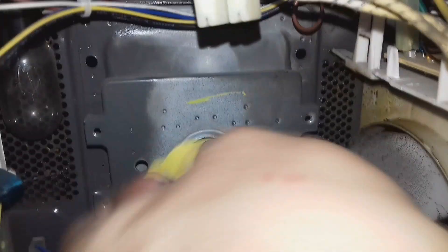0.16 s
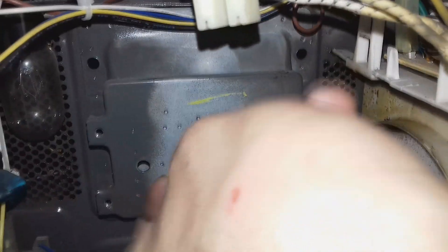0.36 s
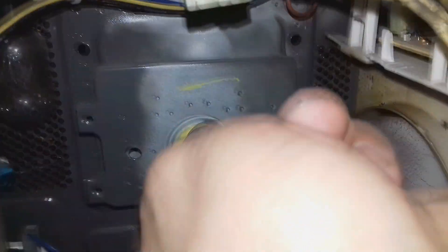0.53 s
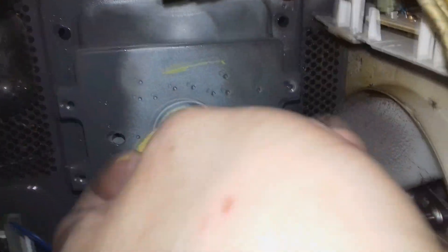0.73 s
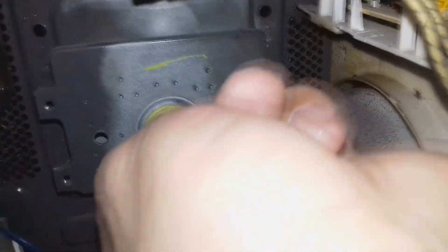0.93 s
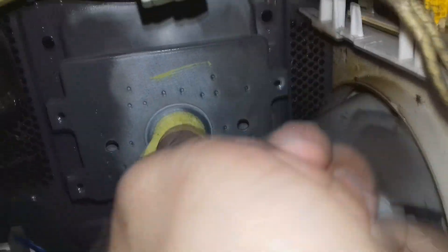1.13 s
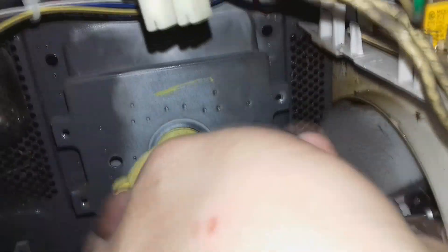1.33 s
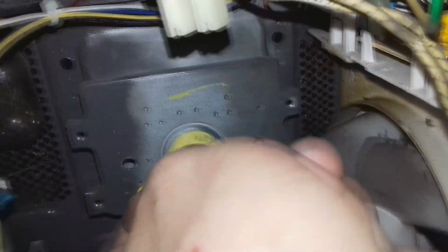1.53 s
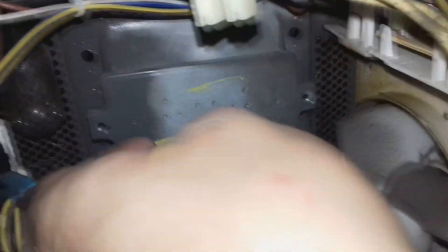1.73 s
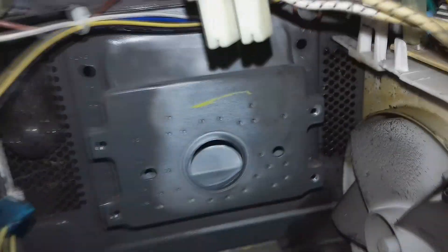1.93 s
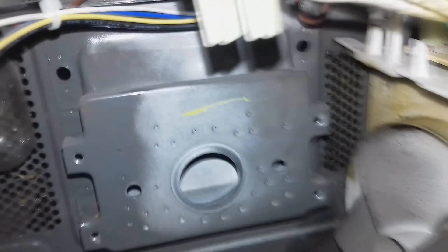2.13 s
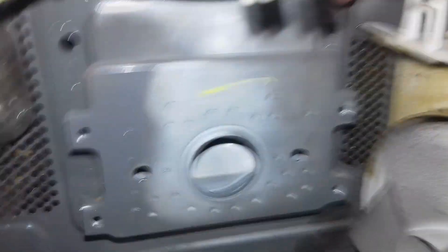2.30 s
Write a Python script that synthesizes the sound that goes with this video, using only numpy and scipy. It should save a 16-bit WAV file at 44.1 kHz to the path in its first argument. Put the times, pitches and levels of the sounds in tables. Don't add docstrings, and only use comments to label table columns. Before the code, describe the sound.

Short scratchy sandpaper strokes on thin metal, with hand bumps, then a rustle and small tick

```python
import sys
import numpy as np
from scipy import signal
from scipy.io import wavfile
from scipy.ndimage import uniform_filter1d

SR = 44100
rng = np.random.default_rng(int(sys.argv[2]) if len(sys.argv) > 2 else 0)


def to_wav(sig):
    pcm = np.clip(np.atleast_2d(sig), -1, 1) * 32767
    pcm = np.round(pcm).astype(np.int16)
    wavfile.write(sys.argv[1], SR, pcm.T)


def volts(x):
    e = np.asarray(x, float) / 20
    return 10 ** e


N = 108486

# f/Hz, level/dB per Hz
SHEET_SPECTRUM = [(590, -15.5), (1000, -26), (1280, -10), (1510, -6.5), (1810, -2.5), (2100, -12.5),
                  (3240, 0), (3630, -10.5), (6000, -31.5), (7800, -49.5), (13200, -120)]


def evened(x):
    return x / np.sqrt(np.mean(x ** 2) + 1e-20)


def unit(x):
    return x / np.linalg.norm(x)


def filtered(x, order, hz, kind):
    return signal.sosfilt(signal.butter(order, hz, kind, fs=SR, output="sos"), x)


def coloured(x, points):
    hz = np.maximum(np.fft.rfftfreq(4096, 1 / SR), 1)
    f, db = np.transpose(points)
    octaves_out = np.log2(np.maximum(f[0] / hz, 1)) + np.log2(np.maximum(hz / f[-1], 1))
    level_db = np.interp(np.log(hz), np.log(f), db) - 40 * octaves_out
    log_gain = np.log(volts(np.maximum(level_db, -100)))
    full = np.concatenate([log_gain, log_gain[-2:0:-1]])
    taps = np.fft.ifft(np.exp(np.conj(signal.hilbert(full)))).real
    return signal.oaconvolve(x, unit(taps))[:len(x)]


def add(mix, s, sound):
    part = mix[max(round(s * SR), 0):][:len(sound)]
    part += sound[:len(part)]


def rings(modes, t):
    return sum(volts(db - 60 * t / max(t60, .004)) * np.sin(2 * np.pi * hz * t) for hz, db, t60 in modes)


def workshop_air():
    # f/Hz, level/dB per Hz
    air_spectrum = [(18, -20), (30, 7), (55, -20), (443, -7), (966, -8), (1720, 0.5), (2510, -8.5),
                    (4480, -32), (12300, -21), (15900, -56), (22000, -120)]
    return volts(-55) * evened(coloured(rng.standard_normal(N), air_spectrum))


def hand_bumps():
    # t/s, level/dB, f/Hz, t60/s
    bumps = [
        (0.109, -36, 278, 0.063),
        (0.679, -45, 154, 0.23),
        (0.729, -36.5, 200, 0.1),
        (1.05, -40, 311, 0.2),
        (1.18, -31, 248.5, 0.14),
        (1.202, -40, 150, .3),
        (1.26, -44, 240, 0.22),
        (1.641, -39.5, 243, .15),
        (1.98, -52.5, 111.6, 0.48),
        (2.385, -43, 560, 0.033),
    ]
    out, t = np.zeros(N), np.arange(SR // 3) / SR
    soft_onset = np.minimum(t / 0.0044, 1)
    for s, db, hz, t60 in bumps:
        add(out, s, rings([(hz, db, t60), (hz * 1.555, db - 1, t60 * 0.39)], t) * soft_onset)
    return out


def part_tick():
    # f/Hz, level/dB, t60/s
    tick_modes = [(1735, -3, .03), (2650, 7, .005), (3420, -2, .016), (1760, -15, .15)]
    tick_s, tick_db, crack_db, crack_decay_s = 2.402, -29, -42, .0012
    out, t = np.zeros(N), np.arange(SR // 3) / SR
    crack = evened(coloured(rng.standard_normal(len(t)), SHEET_SPECTRUM))
    add(out, tick_s, volts(tick_db) * rings(tick_modes, t) * np.minimum(t / .00015, 1))
    add(out, tick_s, volts(crack_db) * crack * np.exp(-t / crack_decay_s))
    return out


def hand_rustle():
    # t/s, level/dB
    rustle_level = [(2.05, -112), (2.199, -54.5), (2.331, -49.5), (2.4, -55), (2.46, -50.5)]
    centre_hz, width_hz = 2480, 1120
    rub = evened(filtered(grit(), 2, [centre_hz - width_hz / 2, centre_hz + width_hz / 2], "band"))
    s, db = np.transpose(rustle_level)
    return rub * volts(np.interp(np.arange(N) / SR, s, db, left=-90))


def hand_drag(dull):
    rumble = filtered(rng.standard_normal(N), 2, [74, 200], "band")
    return volts(-60) * evened(rumble * uniform_filter1d(dull + 1e-4, 3000) ** 0.36)


def grit():
    grains_per_s, spread_db, chatter_db, chatter_s = 7000, 3, 1.5, 0.0033
    size = volts(spread_db * np.minimum(rng.exponential(1, N), 5)) * rng.choice([-1., 1.], N)
    grains = size * (rng.random(N) < grains_per_s / SR)
    span = max(round(chatter_s * SR), 2)
    chatter = evened(uniform_filter1d(uniform_filter1d(rng.standard_normal(N), span), span))
    return evened(grains * volts(chatter_db * chatter))


def snags():
    # t/s, level/dB
    catches = [(.129, -7.5), (.233, -23), (.249, -15), (.509, -20.5), (.632, -14), (0.652, -15),
               (.735, -11.5), (.778, -13.5), (1.009, -16), (1.032, -10), (1.206, -16), (1.235, -9),
               (1.62, -24.5), (1.7, -17), (1.816, -15.5)]
    snag_db, decay_s = -13.5, 0.0022
    out, t = np.zeros(N), np.arange(1200) / SR
    for s, db in catches:
        burst = rng.standard_normal(len(t)) * np.exp(-t / decay_s)
        add(out, s - .001, 4 * volts(db + snag_db) * burst)
    return out


def pressure():
    # start t/s, strongest t/s, end t/s, pressure level/dB, brightness tilt/dB
    strokes = [(-.02, -0.001, 0.023, -25.5, -1), (0.071, 0.115, .2, -27.5, -2),
               (0.215, 0.253, 0.31, -24, -3), (0.307, 0.318, 0.37, -30.5, -2),
               (0.436, 0.478, 0.49, -34, 1.5), (0.518, 0.49, 0.6, -38, -0.5), (.595, 0.639, .655, -29, 0.5),
               (0.639, 0.69, .703, -11, 1), (0.723, 0.727, 0.76, -17, -6), (0.788, 0.783, .84, -24, -0.5),
               (0.816, 0.876, .94, -24.5, -0.5), (1.009, 1.001, 1.039, -32, 5.5),
               (1.03, 1.065, 1.085, -17, -2), (1.085, 1.122, 1.15, -38, -11.5),
               (1.202, 1.217, 1.232, -24, 2), (1.236, 1.24, 1.306, -25.5, -0.5),
               (1.275, 1.28, 1.375, -28.5, -2.5), (1.392, 1.411, 1.465, -32, 0),
               (1.432, 1.45, 1.485, -32.5, -5), (1.521, 1.561, 1.57, -22, 0),
               (1.601, 1.649, 1.695, -31, 1.5), (1.685, 1.725, 1.94, -29.5, -1),
               (1.813, 1.84, 1.86, -18, 1.5), (1.827, 1.885, 1.925, -9.5, -3.5)]
    rise_db_per_s, lift_off_db = 255, -9
    t, dull, bright = np.arange(N) / SR, np.zeros(N), np.zeros(N)
    for start, top, end, db, tilt_db in strokes:
        times = [start - .001, start, top, end, end + 0.0085]
        levels = [-60, -rise_db_per_s * (top - start), 0, lift_off_db, -60]
        shape = volts(db + np.interp(t, times, levels))
        dull += (shape * volts(-tilt_db)) ** 2
        bright += (shape * volts(tilt_db)) ** 2
    return np.sqrt(dull), np.sqrt(bright)


def panel():
    # f/Hz, level/dB per Hz
    fizz_spectrum = [(3410, -35), (5800, -3), (7740, 1.5), (9390, -13.5), (9940, -1.5), (10500, -5.5),
                     (10900, -13), (11600, -6.5), (12300, -33), (15900, -47), (22000, -120)]
    # f/Hz, level/dB per Hz
    cabinet_spectrum = [(140, -30.5), (230, -9.5), (296, 1), (329, -15), (363, 4), (496, -6.5), (842, -1.5),
                        (1000, -9.5), (1300, -53), (2200, -120)]
    # f/Hz, level/dB, t60/s
    panel_modes = [(2350, -6, .12), (1297, -5, .35), (1661, -10, .25), (1748, -7, .36), (1845, -4, .3),
                   (1905, -5, .25), (2600, -3, .15), (2833, -7, .25), (2983, -4, .35), (3144, -1, .36),
                   (3290, -3, .14), (3460, -9, .2), (3711, -11, .2), (4554, -15, .25)]
    scratch_t60, ring_t60, room_t60 = 0.021, 0.23, 0.7
    scratch_db, ring_db, room_db, direct_db = -0.5, -3.5, -7.5, -3
    t = np.arange(SR) / SR
    scratch, ring, room = rng.standard_normal((3, SR))
    dense = volts(scratch_db) * unit(scratch * volts(-60 * t / scratch_t60))
    dense += volts(ring_db) * unit(ring * volts(-60 * t / ring_t60))
    dense += volts(room_db) * unit(room * volts(-60 * t / room_t60) * np.minimum(t / 0.012, 1))
    dense += volts(direct_db) * (t == 0)
    sheet = unit(unit(coloured(dense, SHEET_SPECTRUM)) + volts(-10) * unit(rings(panel_modes, t)))
    low = signal.sosfiltfilt(signal.butter(2, 1900, fs=SR, output="sos"), sheet)
    fizz = volts(-28) * unit(coloured(dense, fizz_spectrum))
    cabinet = volts(-17) * unit(coloured(dense, cabinet_spectrum))
    return low, sheet - low, fizz, cabinet


def sanding(dull, bright):
    fresh_db, fresh_s = 9, 0.29
    wander_s = 0.08903
    now, out = np.arange(N) / SR, np.zeros(N)
    grains, catches = grit(), snags()
    mean = np.sqrt(dull * bright) / volts(-30)
    fizz = volts(-28.5 + fresh_db * (now < fresh_s)) * mean ** 0.77
    boom = volts(-30) * mean ** 0.7
    drives = [grains * p + catches for p in (dull, bright, fizz)] + [grains * boom]
    for spot in range(3):
        share = np.sqrt(2 / 3) * np.sin(np.pi * (now / (3 * wander_s) + spot / 3))
        for drive, body in zip(drives, panel()):
            out += signal.oaconvolve(share * drive, body)[:N]
    return filtered(out, 4, 240, "high")


def scene():
    dull, bright = pressure()
    handling = hand_bumps() + part_tick() + hand_rustle() + hand_drag(dull)
    return (workshop_air() + handling + sanding(dull, bright))[None]


def thinned_treble(x):
    from_hz = 5500
    hz, t, z = signal.stft(x, SR, nperseg=2048, noverlap=1536)
    power = uniform_filter1d(abs(z) ** 2, size=5, axis=2) + 1e-16
    power_db = 10 * np.log10(power)
    loud_db = 10 * np.log10(power[:, 50:180].mean(1, keepdims=True))
    near_db = 1.2 + uniform_filter1d(power_db, size=91, axis=1)
    patches = rng.standard_normal((65, len(t) // 7 + 1))
    chance = np.repeat(np.repeat(patches, 16, axis=0), 7, axis=1)[:len(hz), :len(t)]
    margin_db = -14 + .55 * (loud_db + 76) + 1.7 * (hz[:, None] - from_hz) / 1000
    margin_db = np.minimum(margin_db, 4.5) + 2.5 * chance
    keep = (hz[:, None] < from_hz) | (power_db > near_db + margin_db)
    return signal.istft(z * keep, SR, nperseg=2048, noverlap=1536)[1][:, :N]


def roll_off(x):
    return signal.sosfilt(signal.butter(12, 12410, fs=SR, output="sos"), x)


def record(dry):
    x = thinned_treble(filtered(dry, 4, 75, "high"))
    return roll_off(x - .0007)


dry = scene()
out = record(dry)
to_wav(out)
```